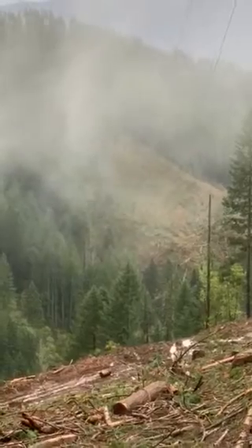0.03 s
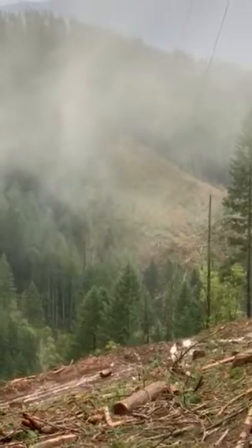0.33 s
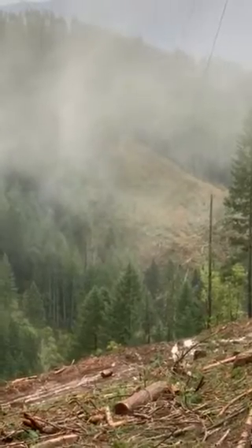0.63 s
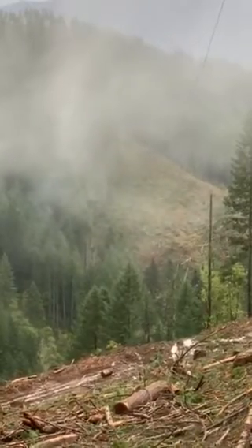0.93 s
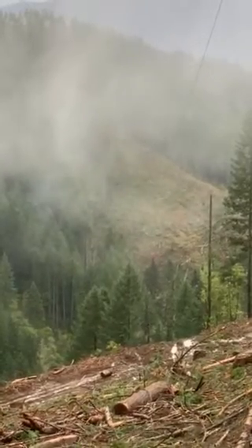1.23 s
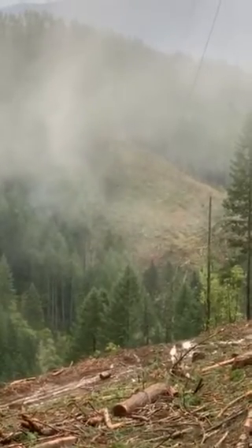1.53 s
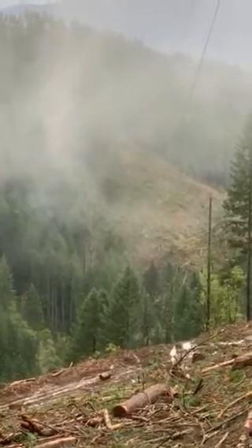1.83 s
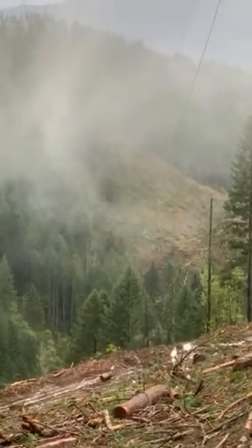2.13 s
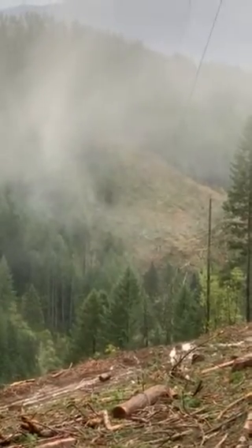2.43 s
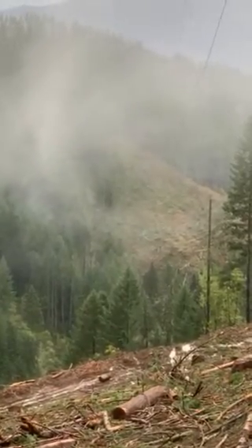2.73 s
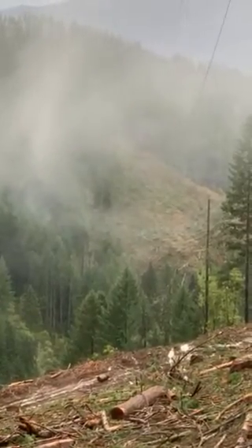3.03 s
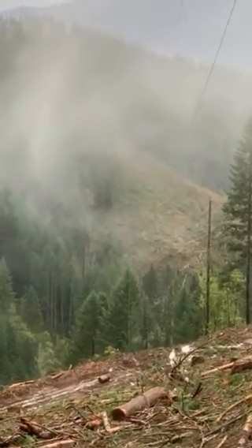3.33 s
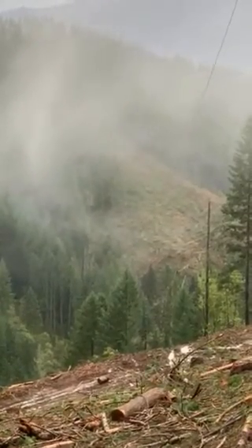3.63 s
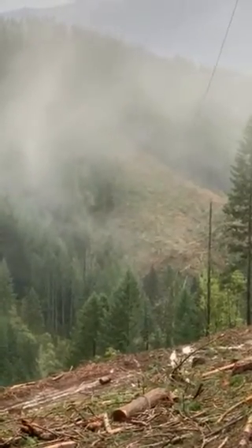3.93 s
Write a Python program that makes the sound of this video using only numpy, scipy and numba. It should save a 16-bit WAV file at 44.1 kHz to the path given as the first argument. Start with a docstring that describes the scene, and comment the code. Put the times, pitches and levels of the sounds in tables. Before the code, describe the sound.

An air horn toots twice, short and loud, echoing over a distant diesel rumble.

```python
"""Signal horn across a clear-cut

A logging air horn toots twice; the ground, the trees and the far slopes reflect its harmonics.
A diesel yarder rumbles in the valley, a line spectrum over a roar, amid air in the trees, faint birds
and rustles. The recorder's gain control ducks the rumble under the toots."""
import sys
import numpy as np
from scipy import signal
from scipy.fft import rfft, irfft
from scipy.io import wavfile
from scipy.ndimage import uniform_filter1d, minimum_filter1d
from numba import njit

SR = 44100
rng = np.random.default_rng(int(sys.argv[2]) if len(sys.argv) > 2 else 0)


def dump(signal):
    """Clip the signal to [-1, 1] and save it as 16-bit WAV at the path in sys.argv[1]."""
    limited = np.clip(np.atleast_2d(signal).T, -1, 1)
    pcm = np.round(limited * 32767).astype(np.int16)
    wavfile.write(sys.argv[1], SR, pcm)


N = 176400
T = np.arange(N) / SR


def undb(db):
    """Amplitude ratio of a level in decibels."""
    return 10 ** (np.asarray(db) / 20)


def unit(x):
    """Normalisation to unit rms."""
    return x / np.sqrt(np.mean(x ** 2))


def colour(x, points, power=1):
    """Zero-phase filtering by a curve of (f/Hz, level/dB) points, its gain raised to a power."""
    hz, db = np.array(points, float).T
    f = np.fft.rfftfreq(N, 1 / SR) + 1
    return irfft(rfft(x) * undb(power * np.interp(np.log(f), np.log(hz), db)), N)


def walk(rate_hz):
    """Smooth random modulation of unit rms."""
    hold = int(SR / rate_hz)
    steps = np.repeat(rng.standard_normal(N // hold + 2), hold)
    return unit(uniform_filter1d(uniform_filter1d(steps, hold), hold)[:N])


def ramp(u):
    """Raised-cosine step from 0 to 1."""
    return np.sin(np.pi / 2 * np.clip(u, 0, 1)) ** 2


def swell(start, length):
    """Half-sine envelope."""
    return np.sin(np.pi * np.clip((T - start) / length, 0, 1))


def late(x, delay):
    """Propagation delay in seconds."""
    return np.interp(T[:len(x)] - delay, T[:len(x)], x, left=0)


def noise_bursts(events, width_hz):
    """Stereo noise in Gaussian bands under half-sine envelopes."""
    f = np.fft.rfftfreq(N, 1 / SR)
    out = np.zeros((2, N))
    for start, length, hz, db in events:
        spectrum = rfft(rng.standard_normal((2, N))) * np.exp(-((f - hz) / width_hz) ** 2)
        out += undb(db) * swell(start, length) * unit(irfft(spectrum, N))
    return out


# Stereo width: f/Hz, side level re mid/dB
SIDE_SPECTRUM = [(60, -12), (130, -19), (290, -10.5), (640, 0), (1400, -7.5), (3000, -1), (7000, 1.5)]

def wide_noise(spectrum):
    """Interaural coherence: outdoor noise is alike at both ears in the bass and wide in the treble."""
    mid, side = rng.standard_normal((2, N))
    return unit(colour(mid + colour(side, SIDE_SPECTRUM) * np.array([[1], [-1]]), spectrum))


# Air in the trees: f/Hz, relative spectral level/dB
AIR_SPECTRUM = [(100, 11.5), (600, 3.5), (1900, 8.5), (2800, -1), (4000, -5), (5000, -10), (7500, -10.5),
                (8500, -18.5), (9600, -48.5), (12000, -51.5), (15000, -48)]

def air():
    """Flow noise: air in the trees gives a nearly steady broadband hiss."""
    return undb(-47.5 + 0.1 * walk(7.4)) * wide_noise(AIR_SPECTRUM)


# Far bird calls: onset t/s, duration/s, centre f/Hz, level/dB
BIRD_CALLS = [(1.13, 0.12, 5750, -62.5), (1.35, 0.077, 5750, -64), (2.38, 0.085, 5690, -57.5),
              (3.517, 0.16, 3450, -53), (3.54, 0.15, 5670, -59.5), (3.8, 0.19, 5690, -58.5)]

def birds():
    """Amplitude-modulated narrow-band noise, heard as thin calls."""
    return undb(3.5 * walk(60)) * noise_bursts(BIRD_CALLS, width_hz=170)


# Rustles and twig ticks: onset t/s, duration/s, centre f/Hz, level/dB
RUSTLE_BURSTS = [(0.355, 0.0044, 7500, -57), (0.553, 0.084, 6300, -55.5), (1.674, 0.1, 6000, -55),
                 (1.83, 0.085, 6400, -55)]

def rustles():
    """Broadband transients, roughened by fast amplitude modulation."""
    return undb(3 * walk(220)) * noise_bursts(RUSTLE_BURSTS, width_hz=1800)


# Engine orders: multiple of the cycle frequency, relative level/dB
ENGINE_ORDERS = [(5, -13), (6, 0.5), (7, -14.5), (8, -8.5), (9, -10.5), (10, -4.5), (13, -12), (14, -12),
                 (15, -15.5), (17, -16), (18, -14), (24, -14), (26, -22.5), (30, -21), (40, -36.5),
                 (48, -21.5)]
# Engine roar: f/Hz, relative spectral level/dB
ROAR_SPECTRUM = [(20, -37), (35, -28), (47, -12), (56, 1), (72, 3.5), (85, 3.5), (115, 1.5), (130, -0.5),
                 (165, -1.5), (210, -1), (230, -8.5), (295, -6.5), (360, -12), (440, -18), (570, -20.5),
                 (850, -17.5), (1000, -27), (1180, -22.5), (1400, -31), (2000, -35), (3000, -69.5)]
# Leftward bias, about half applied to each ear in opposite senses: f/Hz, level/dB
LEFT_BIAS = [(60, 0), (110, 5), (200, 6.5), (380, 7.5), (690, 2), (1280, -2), (3000, -0.5)]
# Gain of the whole rumble: t/s, level/dB
RUMBLE_GAIN = [(0, -6), (.55, -3), (.9, 0.5), (1.5, -0.5), (2.2, 2.5), (3.0, 1.5), (3.42, 2.5), (3.6, 2),
               (3.8, 2), (4, 2)]
CYCLE_HZ = 11.93

def yarder():
    """Periodic combustion: a distant diesel radiates wavering harmonics of its cycle over a roar."""
    cycle_phase = 2 * np.pi * np.cumsum(CYCLE_HZ * (1 + 0.00308 * walk(2.01))) / SR
    orders = np.zeros(N)
    for k, db in ENGINE_ORDERS:
        amplitude = np.sqrt(2) * undb(db + 2.3 * walk(9))
        orders += amplitude * np.sin(k * cycle_phase + rng.uniform(0, 2 * np.pi) + 0.28 * walk(7))
    roar = undb(-26.5 + walk(16)) * wide_noise(ROAR_SPECTRUM)
    left, right = undb(-31) * orders + roar
    rumble = np.array([colour(left, LEFT_BIAS, 0.56), colour(right, LEFT_BIAS, -0.49)])
    return rumble * undb(np.interp(T, *np.array(RUMBLE_GAIN).T))


def scatter(partial, delay, t60):
    """Diffuse reflection: many surfaces return a decaying cloud of echoes, scaled to the input power."""
    age = T[:SR] - delay
    cloud = rng.standard_normal((2, SR)) * (age > 0) * undb(-60 * np.maximum(age, 0) / t60)
    cloud = cloud + 0.066 * cloud[::-1]  # slight coherence between the ears
    out = signal.fftconvolve(partial.imag[None], cloud, axes=1)[:, :len(partial)]
    return out * np.sqrt(np.mean(partial.imag ** 2) / np.mean(out ** 2))


def reflect(partial, hz, delay, spread):
    """Time spreading: a deep surface returns a partial late, rounded and out of step between the ears."""
    carrier = np.exp(2j * np.pi * hz * T[:len(partial)])
    envelope = uniform_filter1d(partial / carrier, max(1, int(spread * SR)), mode="constant")
    ear_phase = rng.uniform(0, 2 * np.pi) + rng.choice([-1, 1]) * 0.67 * np.array([[1], [-1]])
    return (late(envelope, delay) * carrier * np.exp(1j * ear_phase)).imag


# Response of the forest: f/Hz, relative level/dB
FOREST_RESPONSE = [(300, -14), (760, -21.5), (1500, 1.5), (2300, 7.5), (3000, -9), (4500, -4.5), (6000, -8),
                   (7000, 5), (14000, -15)]

def forest(partial, hz):
    """Reverberation among trees: damping shortens the decay as frequency rises."""
    tail = scatter(partial, delay=0.03, t60=1.52 / (1 + 0.11 * hz / 1000))
    return tail * undb(-5.5 + np.interp(hz, *np.array(FOREST_RESPONSE).T))


# Slope echoes: delay t/s, centre f/Hz, half-width/octaves, level at centre/dB, spread/s
SLOPE_ECHOES = [(0.086, 1500, 0.36, 4.5, 0.013), (0.048, 2280, 0.16, 6.5, 0.092),
                (.15, 2700, 0.66, -14.5, 0.023), (0.207, 3270, 0.26, -14.5, 0.026),
                (0.229, 7500, 0.83, -18.5, 0.032), (0.259, 2270, .25, -3.5, 0.022),
                (0.285, 3030, 0.18, -6, 0.061), (0.3, 960, 0.28, -22, 0.024),
                (0.418, 1510, 0.16, -9.5, 0.015), (0.379, 3100, 0.95, -31.5, 0.052),
                (0.557, 2580, 0.18, -18.5, 0.018), (0.78, 1300, 0.15, -15.5, .04)]

def slopes(partial, hz):
    """Frequency-selective reflection: each slope returns a discrete echo in its own band."""
    out = np.zeros((2, len(partial)))
    for delay, centre_hz, width, db, spread in SLOPE_ECHOES:
        octaves = np.log2(hz / centre_hz)
        if abs(octaves) < 1:
            out += undb(db) * np.exp(-(octaves / width) ** 2) * reflect(partial, hz, delay, spread)
    return out


# Toots: onset t/s, duration/s, relative level/dB, weight of the sharp, rasping start
HORN_TOOTS = [(2.486, 0.098, 0.5, 0.95), (2.661, 0.089, -0.5, 0.567)]
# Overtones: harmonic number, relative level/dB, delay t/s, spread/s, onset bite/dB
OVERTONES = [(2, -25.5, 0.0036, 0.0053, 6.5), (3, -26.5, 0.0058, 0.01, -0.5), (4, -30, 0.017, 0.0097, 11),
             (5, -23, 0.022, 0.024, 6.5), (6, -25, 0.024, 0.018, 3), (7, -32.5, 0.0041, .006, -0.5),
             (8, -24.5, 0.025, 0.019, -5.5), (9, -36.5, 0.029, .008, 3.5), (10, -37.5, .025, .008, 0.5),
             (11, -39.5, 0.013, 0.011, 5.5), (12, -38, 0.044, 0.009, -4), (14, -40, 0.022, 0.012, 3),
             (15, -35, .02, .01, 1), (16, -36.5, .022, 0.037, 0.5), (17, -38.5, .02, 0.011, -1.5),
             (18, -37, .02, .02, 1.5), (19, -50.5, .02, .01, 3)]
HORN_HZ, SHARP_HZ, LIFT_HZ, HORN_DB = 755.8, 41.8, 22.35, -0.5
SETTLE_S, RASP_S, BITE_S, RELEASE_S = 0.01225, 0.054, 0.048, 0.02543

def diaphragm_phase(first):
    """Frequency modulation: each toot starts sharp, settles, then lifts as the air is cut."""
    pitch = HORN_HZ * (1 + 0.00017 * walk(120))
    flutter_rad = 0.0054
    for start, length, _, weight in HORN_TOOTS:
        pitch += weight * SHARP_HZ * (T >= start) * np.exp(-np.abs(T - start) / SETTLE_S)
        pitch += LIFT_HZ * swell(start + length, 2 * RELEASE_S)
        flutter_rad += 0.033 * weight * swell(start, RASP_S)  # rasp as the diaphragm starts up
    return 2 * np.pi * np.cumsum(pitch[first:]) / SR + (flutter_rad * walk(900))[first:]


def harmonic(phase, attack, release, bite_db=0, ring_on=0):
    """Analytic signal of one harmonic, gated by the toots; the bite shifts its level at each onset."""
    envelope = np.zeros(len(phase))
    for start, length, db, _ in HORN_TOOTS:
        age = T[-len(phase):] - start
        gate = ramp(age / attack) * ramp(1 - (age - length - ring_on) / release)
        envelope += gate * undb(HORN_DB + db + bite_db * ramp(2 - 2 * age / BITE_S))
    return np.sqrt(2) * envelope * np.exp(1j * phase)


def horn():
    """Multipath propagation: only the fundamental arrives directly, the overtones by reflection."""
    first = int((HORN_TOOTS[0][0] - 0.05) * SR)  # silent before this sample
    phase = diaphragm_phase(first)
    tone = harmonic(phase, attack=0.008, release=RELEASE_S, ring_on=0.006)  # outlasts the overtones
    direct = tone.imag * undb([[-11.5], [0]])  # louder on the right
    ground = undb(-14.5) * late(tone.imag, 22.5 / HORN_HZ)  # the odd half cycle interferes destructively
    out = direct + ground + forest(tone, HORN_HZ) + slopes(tone, HORN_HZ)
    for k, db, delay, spread, bite_db in OVERTONES:
        hz = k * HORN_HZ
        attack = 0.0036 + 0.0015 * min(hz - HORN_HZ, 6500) / 1000  # high partials build up later
        overtone = undb(db) * harmonic(k * phase, attack, RELEASE_S / 2, bite_db)
        out += reflect(overtone, hz, delay, spread)
        out += undb(-7) * scatter(overtone, delay=0.004, t60=0.18)  # nearby stumps and trees
        out += forest(overtone, hz) + slopes(overtone, hz)
    return np.pad(out, ((0, 0), (first, 0)))


def scene():
    """Linear superposition of the horn, the diesel and the hillside."""
    return horn() + yarder() + air() + birds() + rustles()


@njit
def follow(target, attack, release):
    """First-order lag: the gain falls at one rate and recovers at another."""
    out, gain = np.empty(len(target)), 0.
    for i in range(len(target)):
        gain += (target[i] - gain) * (attack if target[i] < gain else release)
        out[i] = gain
    return out


def gain_control(x, top_db, attack_s, hold_s, release_s, ahead_s):
    """Compression: peaks above the threshold lower the gain, which holds and then recovers."""
    target_db = np.minimum(0, top_db - 20 * np.log10(np.abs(x).max(0) + 1e-9))
    half = int(hold_s * SR / 2)
    held_db = minimum_filter1d(target_db, 2 * half + 1, origin=half)
    gain_db = follow(held_db, 1 / (attack_s * SR), 1 / (release_s * SR))
    return x * undb(np.interp(T + ahead_s, T, gain_db))


def record(dry):
    """Dynamic range and band limiting: slow gain control, a fast limiter and a low-pass filter."""
    x = gain_control(dry, top_db=-6.0, attack_s=0.023, hold_s=0.12, release_s=0.061, ahead_s=0.0012)
    x = gain_control(x, top_db=-1.5, attack_s=0.0005, hold_s=0.008, release_s=0.01, ahead_s=0.002)
    return signal.sosfilt(signal.ellip(8, 0.2, 70, 14700, fs=SR, output="sos"), x)


dry = scene()
out = record(dry)
dump(out)
```